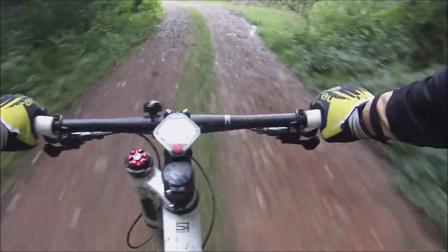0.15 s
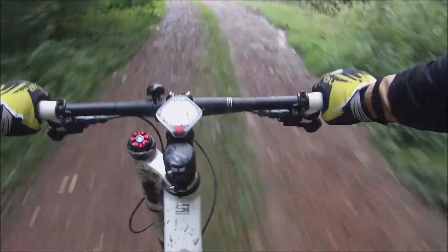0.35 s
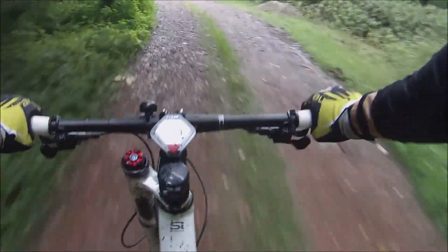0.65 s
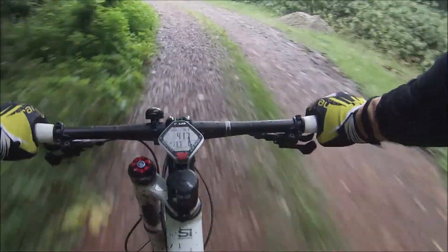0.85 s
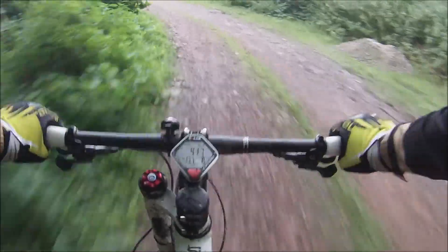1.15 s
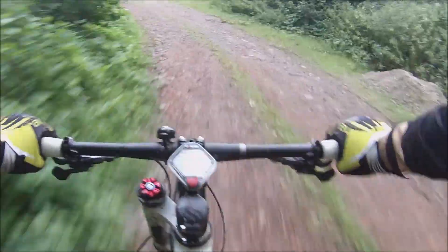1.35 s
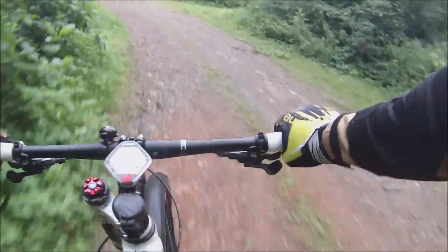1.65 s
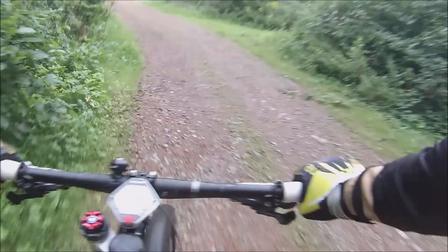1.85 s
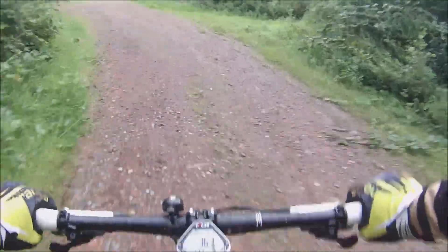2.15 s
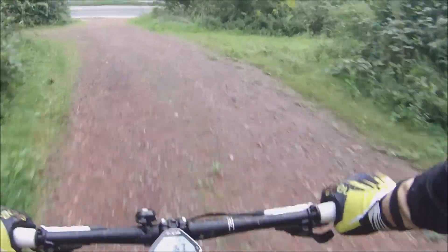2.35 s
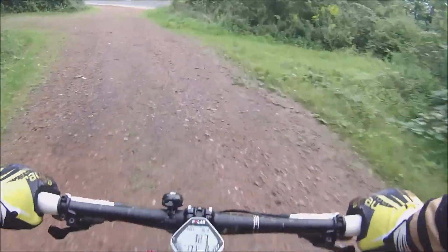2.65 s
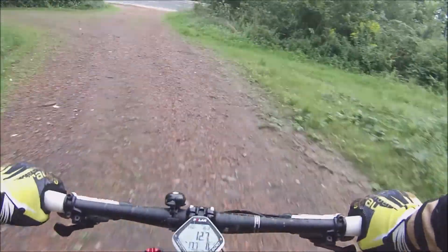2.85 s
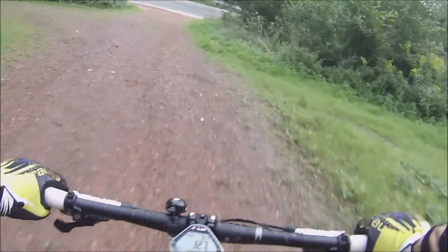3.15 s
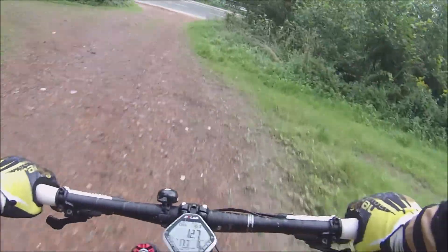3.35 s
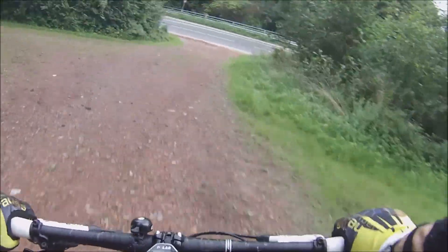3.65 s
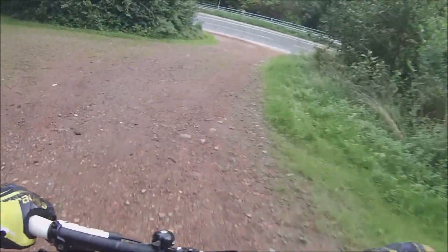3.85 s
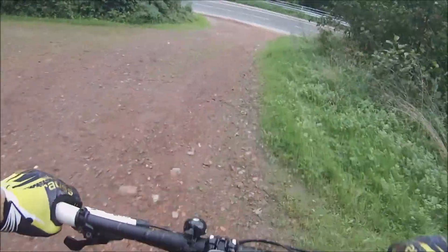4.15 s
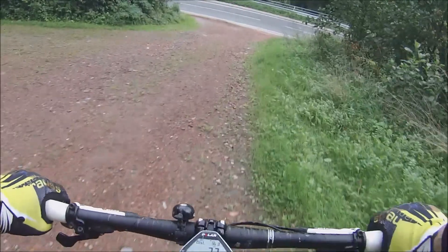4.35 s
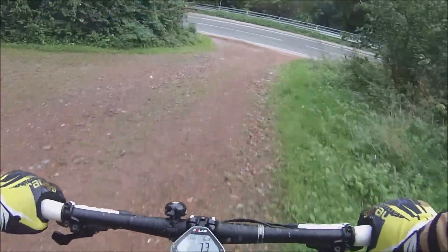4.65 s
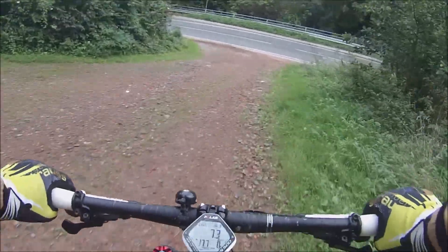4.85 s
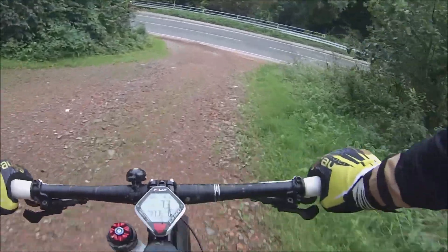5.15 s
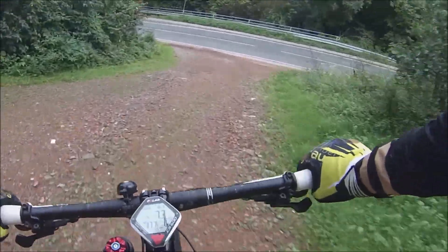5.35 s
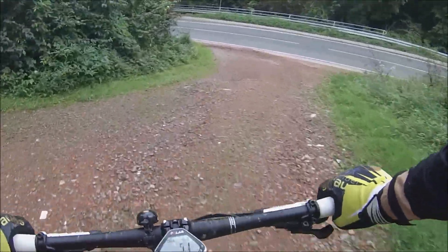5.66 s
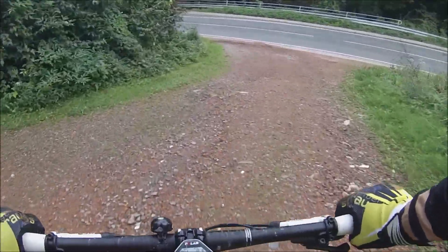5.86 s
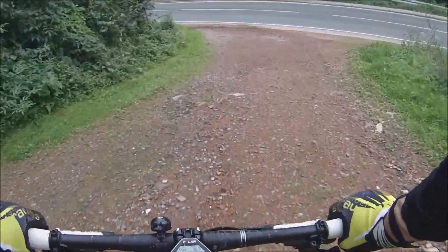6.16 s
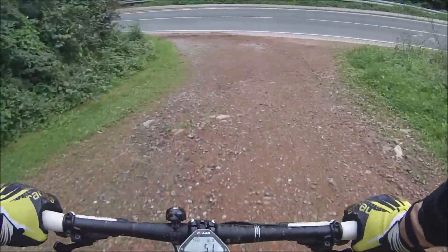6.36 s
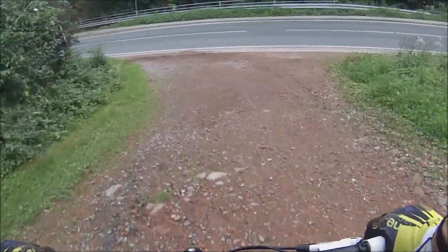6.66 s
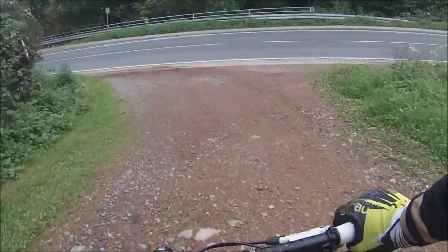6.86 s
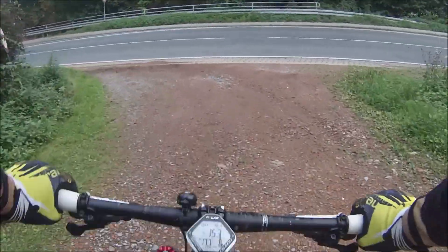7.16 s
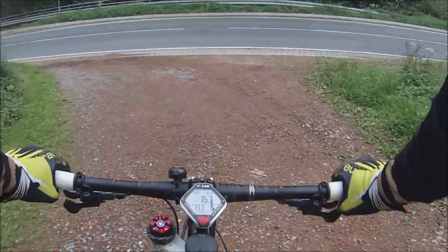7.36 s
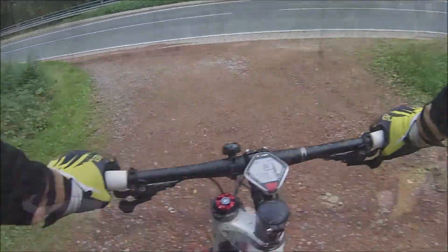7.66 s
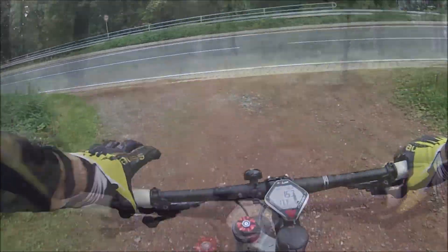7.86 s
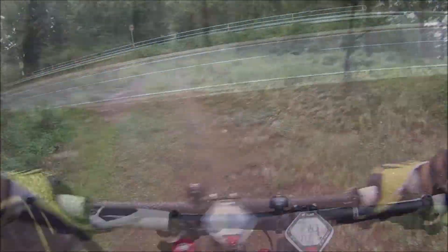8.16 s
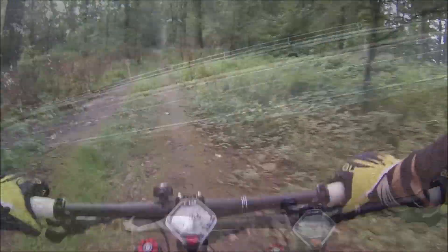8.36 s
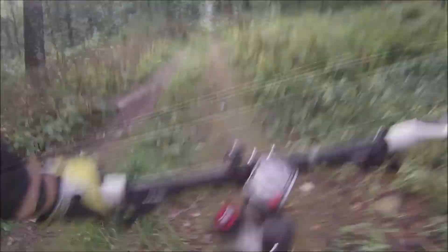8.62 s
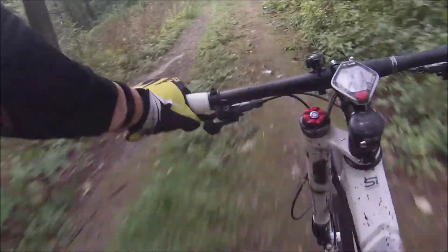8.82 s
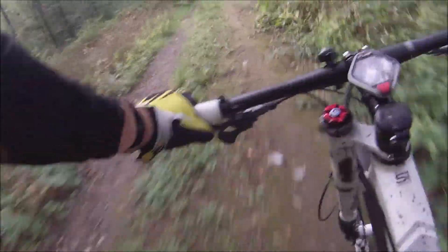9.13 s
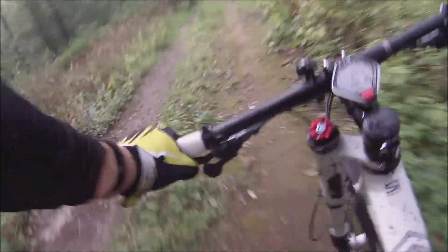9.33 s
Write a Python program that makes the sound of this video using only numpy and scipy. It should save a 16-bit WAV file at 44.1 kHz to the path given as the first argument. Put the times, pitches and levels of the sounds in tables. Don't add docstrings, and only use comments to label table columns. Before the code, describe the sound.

Outdoors on a woodland track, muffled tyre rumble and low wind buffeting lead into harsh gravel skids full of hard, hollow stone knocks. The crunch eases, a freewheel ticks, then slower grit and pebbles return under a faint scraping brake. A heavy bump and rough fabric rubbing strike the microphone case, followed by rustles, rattles and coasting on softer soil. Faint high bush crickets flick past early on.

```python
import sys
import numpy as np
from scipy import signal
from scipy.fft import rfft, irfft, next_fast_len
from scipy.io import wavfile
from scipy.ndimage import uniform_filter1d, map_coordinates

SR = 44100
rng = np.random.default_rng(int(sys.argv[2]) if len(sys.argv) > 2 else 0)


def dump(signal):
    limited = np.clip(np.atleast_2d(signal).T, -1, 1)
    pcm = np.round(limited * 32767).astype(np.int16)
    wavfile.write(sys.argv[1], SR, pcm)


def voltage_ratio(level):
    return 10 ** (np.asarray(level, float) / 20)


N = 418509
TIME = np.arange(N) / SR
THUMP_S = 8.2664


def unit(x):
    return x / np.sqrt(np.mean(x ** 2) + 1e-20)


def bump(centre, width):
    return np.exp(-.5 * ((TIME - centre) / width) ** 2)


def curves(rows, outside=None):
    s, *cols = np.transpose(rows)
    return [np.interp(TIME, s, c, outside, outside) for c in cols]


def wobble(rate):
    return map_coordinates(rng.standard_normal(int(N * rate / SR) + 4), [TIME * rate])


def filtered(x, response):
    m = next_fast_len(N + 8192)
    h = response(np.fft.rfftfreq(m, 1 / SR))
    h = h / np.sqrt(np.mean(np.abs(h) ** 2))
    return irfft(rfft(x, m) * h, m)[:N]


def coloured(points):
    f, db = np.transpose(points)
    noise = rng.standard_normal(N)
    return unit(filtered(noise, lambda hz: voltage_ratio(np.interp(np.log(hz + 1), np.log(f + 1), db))))


def ringing(modes):
    def response(f):
        return sum((-1) ** k * voltage_ratio(db) * 1j * f * w / (c * c - f * f + 1j * f * w)
                   for k, (c, w, db) in enumerate(modes))
    return response


def grains(clump_db, spike_db):
    clumps = voltage_ratio(clump_db * (1.25 * wobble(40) + wobble(150)))
    size = np.minimum(rng.exponential(size=N), 6)
    return unit(clumps * rng.standard_normal(N) * voltage_ratio(spike_db * size))


# (frequency [Hz], level [dB per Hz])
WOODS = [(300, -1.5), (1000, -10), (4000, -14.5), (12000, -24), (15500, -30)]


def woods():
    return voltage_ratio(-62.0 + 0.8 * wobble(25)) * coloured(WOODS)


# (time [s], peak level [dB])
SYLLABLES = [(0.0144, -56), (0.0523, -56), (0.0824, -59), (0.3844, -56), (0.4194, -61), (0.4574, -67),
             (0.4874, -58), (0.63, -56), (0.6654, -49), (0.6993, -64), (1.512, -60), (1.5648, -59),
             (2.315, -65)]
# (time [s], length [s], level [dB], pitch [Hz])
TRILLS = [(3.238, .03, -54, 12130), (3.3, .024, -52, 12200), (3.358, .03, -53, 12150),
          (4.141, 0.019, -53, 12150), (6.767, .05, -48, 12160), (6.882, .048, -53, 12200),
          (7.113, 0.037, -53, 12200)]


def crickets():
    level, hz = np.zeros(N), np.full(N, 12200.)
    for s, db in SYLLABLES:
        level += voltage_ratio(db - 1.0) * bump(s + .006, 0.0047)
    for s, length, db, pitch_hz in TRILLS:
        t = TIME - s
        level += voltage_ratio(db + 2.5 + np.where(t < 0, 1300 * t, -24 * t / length))
        hz = np.where(np.abs(t) < .04, pitch_hz, hz)
    flutter = unit(voltage_ratio(3.3 * wobble(170)))
    phase = 2 * np.pi * np.cumsum(hz + 110 * wobble(300)) / SR
    return level * flutter * np.sin(phase)


# (time [s], level [dB])
GUSTS = [(0.0, -36.5), (0.45, -35), (1.19, -42), (1.64, -34), (2.56, -36.5), (2.75, -38), (4.23, -38),
         (4.52, -43.5), (5.0, -38.5), (5.86, -42.5), (7.32, -33), (7.53, -29), (8.03, -34), (8.48, -28),
         (8.88, -39), (9.2, -36.5), (9.49, -29.5)]
# (frequency [Hz], level [dB per Hz])
BUFFET = [(7.1, -31), (12, 5), (29, -8), (36, -4.5), (48, -18), (90, -29), (120, -39.5), (200, -120)]
# (time [s], depth [dB], half width [s])
EDDIES = [(0.462, -18.5, 0.019), (1.099, -18, 0.013), (1.508, -16, 0.012), (1.908, -3, 0.011),
          (2.335, -15, 0.018), (2.518, -18.5, 0.016), (2.688, -14.5, 0.011), (3.461, -21, 0.0086),
          (3.598, -21.5, 0.0073), (4.747, -19, 0.016), (6.728, -16, 0.012), (7.501, -11, 0.013),
          (7.695, -14, 0.014), (7.771, -14, 0.011), (8.326, -10.5, 0.012), (8.418, -11, 0.0062),
          (8.519, -15, 0.016), (8.599, -12.5, 0.012), (8.662, -14, 0.0124), (8.778, -16, 0.021),
          (9.298, -16.5, 0.02)]


def wind():
    x = voltage_ratio(curves(GUSTS)[0] + 4.0) * unit(voltage_ratio(2.2 * wobble(23)) * coloured(BUFFET))
    t = np.arange(-6000, 8000) / SR
    edges = signal.windows.tukey(len(t), .4)
    for s, db, half in EDDIES:
        dip = np.exp(-.5 * (t / (0.63 * half)) ** 2)
        rebound = 0.4 * np.exp(-.5 * ((t - 0.9 * half) / (1.61 * half)) ** 2)
        x[round(s * SR) - 6000:][:len(t)] += voltage_ratio(db) * (rebound - dip) * edges
    return x


# (time [s], level over the start [dB])
PACE = [(0, -0.5), (.7, 1), (1.3, -1.5), (2.2, -6), (3.2, -12.5), (4.3, -11), (5.3, -18.5), (6, -12.5),
        (7.3, -13.5), (8.1, -9.5), (8.8, -4.5), (9.1, -12), (9.49, -10)]


def pace():
    return curves(PACE)[0]


# (time [s], length [s], start level [dB], end level [dB], brightness [dB])
SKIDS = [(1.302, 0.061, -66, -35, -5), (1.401, 0.076, -26, -27, -4.5), (1.497, 0.16, -25.5, -24.5, -1.5),
         (1.664, 0.11, -19.5, -26, -2), (1.8, 0.016, -39, -52, -12), (1.99, 0.15, -49.5, -42, 0.5),
         (2.107, 0.46, -31, -36, -1.5), (2.624, 0.029, -15, -39.5, -1), (2.689, 0.33, -30.5, -35.5, -2.5),
         (3.038, 0.11, -50, -39, -9), (3.152, 0.36, -30, -32.5, -3), (3.528, 0.071, -24, -32, -6.5),
         (3.581, 0.33, -38.5, -40, -3.5), (3.992, 0.47, -47.5, -34, -5.5), (4.573, 0.076, -25, -69, -14),
         (6.12, 0.48, -37, -39, -0.5), (6.655, 0.51, -40, -38.5, 0.5), (7.18, 0.557, -43.5, -47, 3),
         (7.776, 0.078, -60, -85, 9)]


def skids():
    bite_s, let_go_s = 0.017, 0.021
    plain, bright = np.zeros(N), np.zeros(N)
    for s, length, start_db, end_db, bright_db in SKIDS:
        t = np.maximum(TIME - s, 0)
        grip = (1 - np.exp(-t / bite_s)) * np.exp(-np.maximum(t - length, 0) / let_go_s)
        slide = grip * voltage_ratio(np.interp(t, [0, length], [start_db, end_db]))
        plain += slide
        bright += slide * voltage_ratio(bright_db)
    return plain, bright


# (frequency [Hz], level [dB per Hz])
RUMBLE = [(32, -25), (55, -0.5), (98, 0), (156, -5), (194, -12), (291, -15.5), (380, -25), (490, -24),
          (840, -120)]


def rumble():
    unsteady = voltage_ratio(0.55 * wobble(13) + 1.16 * wobble(35))
    return voltage_ratio(-36.5 + pace()) * unit(unsteady * coloured(RUMBLE))


# (frequency [Hz], level [dB per Hz])
AIR = [(110, -62), (180, -4), (221, -16), (301, -11.5), (345, -7.5), (1100, -15.5), (1430, -27),
       (2420, -120)]


def rush():
    level = voltage_ratio(-52.5 + 0.77 * pace()) + voltage_ratio(-21) * skids()[0]
    flutter = voltage_ratio(.8 * wobble(11) + 2 * wobble(40))
    return level * unit(flutter * coloured(AIR))


# (time [s], jump [full scale], settling time [s])
SPLICES = [
    (7.4475, -0.19, 0.007),
    (8.847, 0.065, 0.019),
]


def splices():
    return sum(jump * (TIME >= s) * np.exp(-np.maximum(TIME - s, 0) / settle)
               for s, jump, settle in SPLICES)


# (time [s], half length [s], pitch [Hz], level [dB])
RASPS = [(7.837, .005, 7000, -57), (8.249, .005, 7000, -60), (8.367, 0.016, 6000, -57),
         (8.44, 0.005, 2980, -60), (8.487, 0.0068, 7800, -58), (8.555, .012, 5200, -66),
         (8.635, 0.012, 4800, -59), (8.67, 0.017, 7650, -56), (8.71, 0.018, 3100, -52),
         (8.832, 0.0089, 6800, -66), (9.121, 0.0033, 5550, -63), (9.146, 0.0037, 7000, -69)]


def rasps():
    x, t = np.zeros(N + 6000), np.arange(-3000, 3000) / SR
    for s, half, hz, db in RASPS:
        band = signal.butter(2, [hz * 0.94, hz * 1.06], "band", fs=SR, output="sos")
        scrape = unit(signal.sosfilt(band, rng.standard_normal(len(t))))
        x[round(s * SR):][:len(t)] += voltage_ratio(db) * scrape * np.exp(-.5 * (t / half) ** 2)
    return x[3000:][:N]


def thump():
    t = np.maximum(TIME - THUMP_S, 0)
    swing = voltage_ratio(-2.5) * np.sin(2 * np.pi * 92 * t) * np.exp(-(t / .021) ** 4)
    swing += .09 * np.exp(-((t - .009) / .008) ** 4)
    swing += .3 * np.exp(-((t - .0138) / .0016) ** 2)
    sag = -voltage_ratio(-6.5) * np.exp(-np.abs(t - .021) / .006) * (t > .017)
    second = voltage_ratio(-13.0) * np.exp(-.5 * ((t - .04) / 0.0014) ** 2)
    # (frequency [Hz], level [dB], time to fall 60 dB [s], phase [rad])
    shell = [(1290, -9, 0.019, -1.2), (1660, -15, 0.022, -1.2), (870, -18, 0.03, 0),
             (407, -24.5, 0.077, 0), (185, -21, 0.1, 4.4)]
    knock = sum(voltage_ratio(db - 60 * t / t60) * np.sin(2 * np.pi * hz * t + phase) for hz, db, t60, phase in shell)
    onset = 1 - np.exp(-t / .0003)
    return (swing + knock) * onset + uniform_filter1d(sag, size=120) + second


# (frequency [Hz], level [dB], time to fall 60 dB [s])
TAP = [(1314, -30.5, 0.053), (1720, -27, 0.043)]


def fingertip():
    t = np.maximum(TIME - 8.6745, 0)
    return sum(voltage_ratio(db - 60 * t / t60) * np.sin(2 * np.pi * hz * t) for hz, db, t60 in TAP)


# (time [s], peak level [dB], brightness [dB])
STROKES = [(8.28, -24.5, -4.5), (8.375, -53, -1), (8.416, -35, 0.5), (8.442, -54, -7), (8.49, -65, 22),
           (8.62, -59, 0), (8.655, -46, 14), (8.72, -47, -2), (8.833, -35.5, -5)]
# (time [s], level [dB])
GRIP = [(8.27, -4.5), (8.33, -13), (8.4, 0), (8.495, -5.5), (8.51, -14), (8.59, -6), (8.63, 0), (8.78, -8),
        (8.85, -2)]
# (time [s], half length [s], level [dB])
RUSTLES = [(8.926, 0.017, -54), (8.967, .008, -57), (9.056, .025, -51.5), (9.26, 0.0076, -58),
           (9.33, 0.018, -53), (9.425, 0.0094, -60)]
# (frequency [Hz], level [dB per Hz])
GLOVE = [(410, -54), (700, -17), (1030, -10), (1290, 0.5), (1520, -1), (1730, 1), (2310, -4), (3090, -13.5),
         (3560, -6.5), (4200, -21), (5460, -47), (9240, -120)]
# (frequency [Hz], level [dB per Hz])
FABRIC = [
    [(2240, -28), (3800, -14), (4550, 5.5), (5470, -1), (6550, -2.5), (7380, -10), (9500, -22), (12400, -51), (20900, -120)],
    [(5000, -34), (8500, -7), (10900, 1), (12700, -7), (14500, -12), (15500, -18)],
]


def rubbing():
    present = TIME < SPLICES[1][0]
    s, db, bright_db = np.transpose(STROKES)[..., None]
    slope = np.where(TIME < s, 421, -552)
    strokes = (TIME > THUMP_S) * present * voltage_ratio(db + slope * (TIME - s))
    swell_db = 21 * np.minimum(TIME - THUMP_S, 0)
    drag = voltage_ratio(-43 + curves(GRIP)[0] + swell_db) * (TIME > 7.75) * present
    tips = strokes * (strokes / voltage_ratio(db)) ** 0.07
    press = strokes.sum(axis=0) + drag
    press += sum(voltage_ratio(level_db) * bump(when, half) for when, half, level_db in RUSTLES)
    hiss = voltage_ratio(-10.5) * (tips.sum(axis=0) + voltage_ratio(-3.0) * drag)
    sheen = voltage_ratio(-21.5) * (tips * voltage_ratio(bright_db)).sum(axis=0)
    fibres = unit(voltage_ratio(1.5 * wobble(60) + 2.6 * wobble(200)))
    return fibres * (press * coloured(GLOVE) + hiss * coloured(FABRIC[0]) + sheen * coloured(FABRIC[1]))


# (time [s], teeth passed [count], level [dB])
HUB = [
    [(4.737, 0, -46), (4.885, 6, -45), (5.0525, 13, -45), (5.4931, 30, -46), (5.8288, 44, -47),
     (6.1099, 56, -47)],
    [(8.8682, 0, -46), (9.1197, 11, -46), (9.3263, 20, -47), (9.3821, 22, -47), (9.4759, 26, -47)],
]
# (frequency [Hz], width [Hz], level [dB])
PAWL = [
    [(2030, 300, -1), (2340, 210, 5), (2860, 350, 0)],
    [(1900, 600, 1.5), (2900, 400, 2), (3470, 500, -2)],
]


def freewheel():
    x = np.zeros(N)
    scrape_decay = voltage_ratio(-60 * np.arange(500) / SR / .012)
    for rows, pawl in zip(HUB, PAWL):
        drops = np.zeros(N)
        s, teeth, db = np.transpose(rows)
        when = np.interp(np.arange(teeth[-1] + 1), teeth, s)
        late, size = rng.standard_normal((2, len(when)))
        places = np.round((when + .001 * late) * SR).astype(int)
        drops[places] = voltage_ratio(np.interp(when, s, db) + 2.4 * size)
        scrapes = np.convolve(drops, scrape_decay)[:N] * rng.standard_normal(N)
        x += filtered(voltage_ratio(-8) * scrapes + voltage_ratio(14) * drops, lambda hz: ringing(pawl)(hz) ** 2)
    return voltage_ratio(-2.5) * x


# (time [s], level [dB])
BRAKE = [(7.04, -63), (7.09, -37), (7.136, -46), (7.184, -29), (7.214, -34.5), (7.284, -34), (7.34, -39.5),
         (7.442, -37), (7.548, -41), (7.578, -34), (7.6, -33.5), (7.654, -31), (7.69, -44.5),
         (7.738, -35.5), (7.772, -61), (7.824, -43), (7.862, -64), (7.9, -60)]
# (frequency [Hz], width [Hz], level [dB])
DISC = [(2078, 31, 2), (2117, 35, 2.5)]


def brake():
    drag = voltage_ratio(curves(BRAKE, -150)[0] - 7.0) * grains(clump_db=4.0, spike_db=-1.5)
    x = np.zeros(N)
    for c, w, db in DISC + [(2288, 53, -1.5), (2356, 46, -12)]:
        note = filtered(drag, lambda hz: ringing([(c, 2.4 * w, 0)])(hz) ** 2)
        x += voltage_ratio(db - 1.0 + 1.4 * wobble(27)) * note
    return x


# (time [s], peak level [dB], upper ring relative to it [dB])
STONES = [(1.4095, -7.5, -5), (1.4534, -3, -8), (1.5133, -11.5, 0), (1.6508, -7, -11), (1.7544, -13, -4),
          (1.809, -17.5, 0.5), (2.0483, -22.5, -3.5), (2.149, -18, -13), (2.2678, -9.5, -3),
          (2.3516, -15, -10), (2.444, -16.5, -12), (2.5059, -10.5, -3.5), (2.5357, -11, -4.5),
          (2.6301, -17.5, -7.5), (2.7072, -25, 4), (2.7678, -16, -17), (2.822, -14, -11),
          (2.9547, -12, -8.5), (3.171, -15, -10), (3.341, -19, -27), (3.412, -14.5, -14), (3.5136, -18, -8),
          (3.5456, -14.5, 0), (3.6086, -15, -3), (3.7988, -19.5, -3), (4.0126, -22.5, -6),
          (4.062, -10.5, -4.5), (4.391, -15, -4), (4.4275, -17, -2), (4.4548, -18.5, -9)]
PEBBLES = [(0.828, -25, 0), (0.893, -21, -22), (0.927, -22.5, -2.5), (4.678, -30, -6.5), (6.1287, -19, -7),
           (6.2171, -12, -4.5), (6.365, -20.5, -8), (6.4129, -16.5, 0), (6.4857, -20.5, 1),
           (6.6773, -29.5, 11), (6.884, -25, 0), (6.93, -26, 3.5), (6.995, -18, -1), (7.079, -23, -9),
           (7.565, -18.5, -7)]
# loose parts of the bike, and near 8.48 and 8.67 s the glove scuffing and
RATTLES = [(5.0519, -38.5, -7), (5.0843, -47.5, 10), (5.2759, -41, -1), (5.3432, -39, -8),
           (5.3664, -37, 3.5), (5.6634, -50.5, 16.5), (7.84, -42, 7), (8.02, -26.5, -2.5),
           (8.4824, -31, -8), (8.6737, -25, -10), (8.9297, -43, 6), (8.953, -37.5, -3), (9.007, -38.5, 0.5),
           (9.0436, -47, 5), (9.1205, -38, -1), (9.145, -39, -14), (9.168, -33.5, -3.5),
           (9.429, -37.5, -0.5)]
# (time [s], peak level [dB], upper ring
# relative to it [dB])
CHIPS = [(1.287, -33, 5), (1.3204, -31.5, 7), (1.3418, -21.5, -3), (1.384, -20, -7), (1.5364, -7.5, -9),
         (1.63, -7, -6), (1.9488, -37, -1), (2.1046, -21, -2), (2.1221, -15.5, 2), (2.1854, -15.5, -17),
         (2.2143, -19, -17), (2.3842, -21, 1), (2.458, -15.5, -0.5), (2.4805, -14.5, -7), (2.665, -24, -8),
         (2.7437, -19, -11), (2.857, -30, -13), (2.906, -15, -5), (3.016, -18, -9), (3.0865, -22, -9),
         (3.1157, -26, 0), (3.2056, -15, -12), (3.232, -19.5, -9), (3.476, -18, -3), (3.6728, -22, -12),
         (3.7232, -19.5, -17), (3.752, -25, -14), (3.8132, -17, -15), (3.848, -18, -11), (3.905, -25, -13),
         (3.9442, -25, -7), (4.096, -23.5, -4), (4.1724, -23.5, -14), (4.2286, -22, -11),
         (4.248, -25.5, -1), (4.285, -40, -1), (4.312, -23, -2), (4.3698, -24, 0), (4.594, -29, 0.5),
         (6.113, -31, 0), (6.1409, -16, 0.5), (6.2866, -25.5, 2), (6.318, -18, -10), (6.402, -27, -1),
          (6.5298, -29.5, 3), (6.5715, -20.5, -5), (6.623, -26, -9), (6.6383, -22, -0.5), (6.7266, -29, 1),
          (6.811, -20.5, -8), (6.858, -46, -7), (6.9152, -42, -10), (6.9728, -22, -4), (7.0304, -28, -9),
          (7.1057, -24, -1.5), (7.1243, -18, 0), (7.1791, -24, 1), (7.224, -29, 4), (7.2556, -30.5, 8),
          (7.2727, -22, 0), (7.3546, -33, 2), (7.3776, -35, 10), (7.4265, -28.5, -4), (7.5318, -30, -2),
          (7.5752, -21, -1.5), (7.6241, -28, -4), (7.6475, -25, 6), (7.6999, -29, 1), (7.734, -31.5, 8),
          (7.9209, -36, 7),
         (0.3611, -43, -10), (0.6204, -41, -2), (1.0994, -25, 3), (1.2057, -31, 5), (1.4294, -15, -3),
         (1.4757, -18, 2), (1.5584, -12.5, -5), (1.5844, -16, 6), (1.6103, -13.5, -6), (1.6797, -12, -7),
         (1.71, -22, -6), (1.7355, -9.5, -21), (2.1705, -19, -9), (2.2956, -19.5, -2), (2.3135, -18, -5),
         (2.7186, -21, -12), (2.785, -25, -8), (2.93, -26, -13), (2.984, -20.5, 3), (3.2594, -16, 1),
         (3.284, -17.5, -0.5), (3.355, -16, -8), (3.3844, -18, -1.5), (3.4296, -16, -6), (3.4544, -28, -4),
         (3.5692, -20, -9), (3.8283, -17.5, -5), (6.1694, -30, -9), (6.2494, -36, -2), (6.3341, -23.5, 4),
         (6.439, -23, 0), (6.7494, -27, -10), (6.7786, -22.5, -3)]
# (time [s], level [dB])
SNAPS = [(1.4543, -22), (1.4645, -23), (1.651, -10), (1.8076, -32), (2.0499, -33), (2.706, -25),
         (4.426, -35), (6.1311, -35), (6.412, -32), (3.3429, -26), (3.5114, -20), (4.456, -42),
         (6.9297, -26), (7.0803, -32)]


def stones():
    t = np.arange(1500) / SR
    lead = round(.007 * SR)
    crumble = voltage_ratio(-0.27 - 60 * t / 0.036) * (1 - np.exp(-(t / 0.008) ** 2))
    crack = np.hanning(14)
    drive = np.zeros((2, N + 1500))
    small = [(s, db - 1, rel_db) for s, db, rel_db in CHIPS]
    for s, db, rel_db in STONES + PEBBLES + RATTLES + small:
        burst = rng.standard_normal((2, 1500)) * voltage_ratio(db) * crumble
        burst[:, lead:lead + 14] += voltage_ratio(db - 8) * crack * [[1], [.4]]
        burst[1] *= voltage_ratio(rel_db + 2.0)
        drive[:, round(s * SR) - lead:][:, :1500] += burst
    for s, db in SNAPS:
        drive[0, round(s * SR):][:14] += voltage_ratio(db) * crack
    return drive[:, :N]


# (time [s], level [dB])
LULLS = [(2.243, -12), (2.375, -12), (2.425, -10), (2.526, -5), (3.192, -4), (3.318, -3), (3.532, -11),
         (3.781, -8), (3.865, -5), (6.465, -6), (6.655, -2), (6.83, -13), (1.495, -2), (2.335, -6.5),
         (2.495, 2), (3.14, -5), (6.2, -2), (6.27, 1.5), (6.39, -2), (6.55, -3), (7.06, -3), (7.4, -4),
         (7.68, -1)]


def skips():
    coarse = TIME[::64]
    when = np.array(STONES + PEBBLES)[:, :1]
    near = np.exp(-.5 * ((coarse - when + 0.03) / 0.03) ** 2).max(axis=0)
    skips_db = sum(db * np.exp(-.5 * ((coarse - s) / 0.008) ** 2) for s, db in LULLS)
    return voltage_ratio(np.interp(TIME, coarse, skips_db - near))


# (frequency [Hz], width [Hz], level [dB])
CASE_LOW = [(295, 16.5, -8), (436.3, 17.4, -13), (618, 165, -15.5), (765.4, 37.6, -6.5), (1262.5, 104.4, 2),
            (1415, 141, 0.5), (1622, 75, -6.5), (612, 26, -9.5), (1300, 24, -3.5)]
CASE_MID = [(1735, 193, 4), (2123, 152, 11.5), (2383, 207, 4.5), (2884, 227, 0.5), (3730, 410, -5.5),
            (4500, 310, -41), (1833, 44, -9.5)]
CASE_PRESSED = [(1760, 98, -1), (2023, 210, 10), (2320, 103, 13), (2910, 160, 1), (3695, 330, -3.5)]
CASE_TOP = [(4730, 830, 3.5), (5470, 310, 8.5), (5705, 410, 2), (7310, 1020, -1), (9600, 540, -6.5),
            (12000, 3800, -17)]
# (time [s], tightness [0-1])
STRAP = [(2.0, 0.33), (3.4, 0.6), (3.7, 0.7), (4.5, 0.7), (4.7, .03), (6.05, .03), (6.12, 0.74), (6.9, .7),
         (7.2, .1)]


def gravel():
    second_ride = TIME > THUMP_S
    coasting = sum((TIME > rows[0][0]) & (TIME < rows[-1][0]) for rows in HUB)
    slide, bright = np.array(skids()) * voltage_ratio(2 * wobble(14)) * skips()
    roll = voltage_ratio(-42.5 + 0.88 * pace() - 3 * second_ride)
    thin = roll * voltage_ratio(-0.41 * pace())
    low, upper = stones()

    grit, own = grains(clump_db=1.0, spike_db=0.0), grains(clump_db=2.0, spike_db=2.5)
    fine = grains(clump_db=2.5, spike_db=4.0)
    body = voltage_ratio(-4) * (roll * voltage_ratio(-6 * second_ride) + slide) * grit
    ring = voltage_ratio(-5.0) * (thin * voltage_ratio(2 - 7.5 * coasting) + bright) * (0.59 * grit + 0.59 * own)
    slide_fizz = voltage_ratio(-48) * (bright / voltage_ratio(-34.5)) ** 0.58
    fizz = voltage_ratio(-3.0) * (thin * voltage_ratio(-17) + slide_fizz) * (0.39 * grit + 0.81 * fine)

    tight = np.clip(curves(STRAP)[0], 0, 1)
    shaken = filtered(body + low, ringing(CASE_LOW))
    shaken += (1 - tight) * filtered(ring + upper, ringing(CASE_MID))
    shaken += tight * filtered(ring + upper, ringing(CASE_PRESSED))
    shaken += filtered(fizz + voltage_ratio(-18.0) * upper, ringing(CASE_TOP))
    return signal.sosfilt(signal.butter(2, 11000, fs=SR, output="sos"), shaken)


def scene():
    background = woods() + crickets() + wind() + rumble() + rush()
    handling = splices() + rasps() + thump() + fingertip() + rubbing()
    return (background + handling + freewheel() + brake() + gravel())[None]


# (time [s], share lost [0-1])
STARVED = [(9.195, 0), (9.205, 1), (9.445, 1), (9.455, 0)]


def flickering(top):
    z = signal.stft(top, nperseg=1024)[2]
    patches = uniform_filter1d(rng.standard_normal(z.shape), size=3, axis=1)
    patches = uniform_filter1d(patches, size=3, axis=2)
    moments = uniform_filter1d(rng.standard_normal(z.shape[2]), size=3)
    faint = np.abs(z) < voltage_ratio(-98)
    lost = faint & (unit(patches) + .6 * unit(moments) > .2)
    kept = signal.istft(z * np.where(lost, 0, 1 + .3 * faint), nperseg=1024)[1][:, :N]
    return kept * (1 - curves(STARVED)[0])


def top_cut(x):
    return signal.sosfilt(signal.butter(12, 16330, fs=SR, output="sos"), x)


def record(dry):
    limit = signal.butter(14, 15250, fs=SR, output="sos")
    kept = signal.sosfiltfilt(limit, np.clip(dry, -1, 1))
    top = signal.sosfiltfilt(signal.butter(14, 12900, "high", fs=SR, output="sos"), kept)
    return top_cut(kept - top + flickering(top))


dry = scene()
out = record(dry)
dump(out)
```